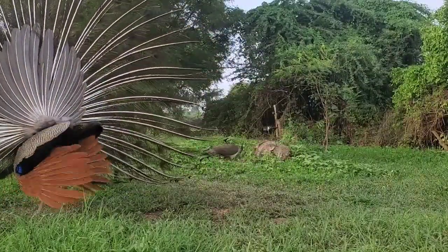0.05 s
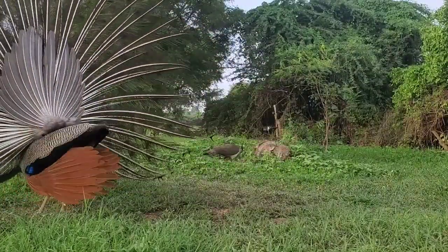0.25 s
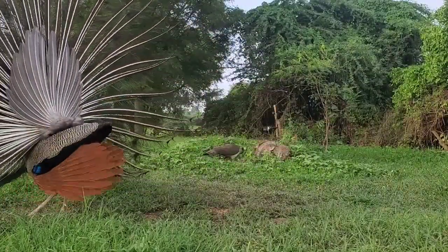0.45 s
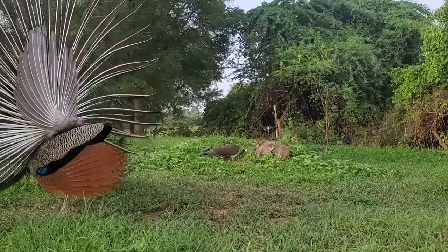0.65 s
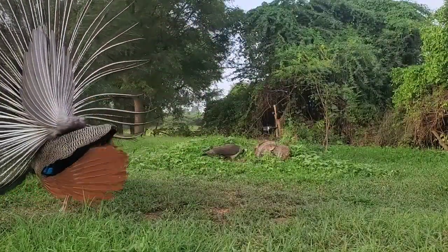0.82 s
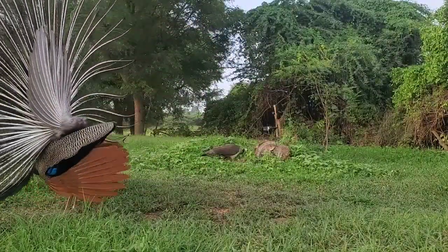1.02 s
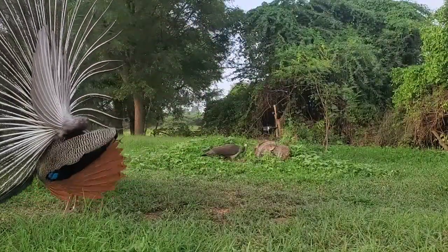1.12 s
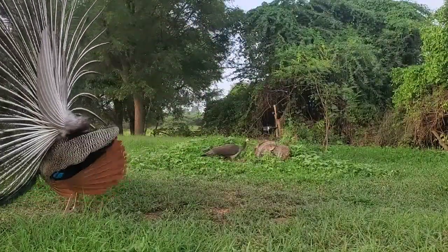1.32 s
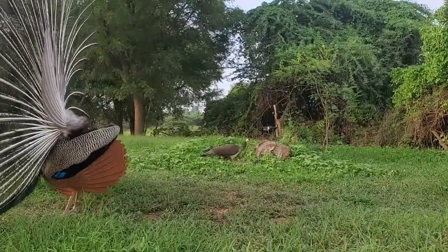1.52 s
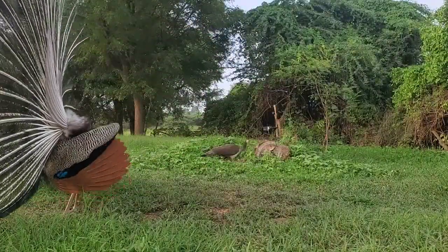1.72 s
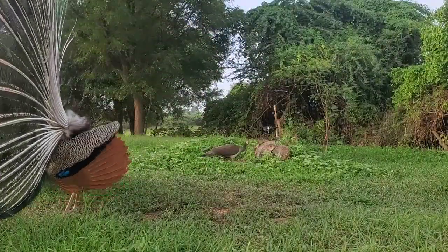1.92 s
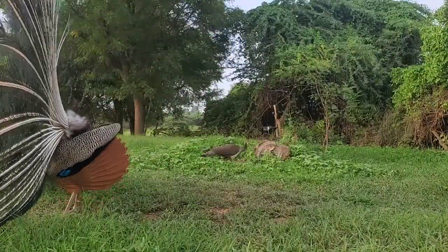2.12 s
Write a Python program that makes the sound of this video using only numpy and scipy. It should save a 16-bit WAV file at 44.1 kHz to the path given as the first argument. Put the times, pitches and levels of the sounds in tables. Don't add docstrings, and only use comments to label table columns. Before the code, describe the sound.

A bird's quick drooping whistle repeats over faint wing flutter, feather rustle and bursts of wind rumble

```python
import sys
import numpy as np
from scipy import signal
from scipy.fft import rfft, irfft, next_fast_len
from scipy.io import wavfile
from scipy.ndimage import uniform_filter1d, map_coordinates

SR = 44100
rng = np.random.default_rng(int(sys.argv[2]) if len(sys.argv) > 2 else 0)


def field_ratio(decibels):
    return 10 ** (np.asarray(decibels, dtype=float) / 20)


def wrap_up_sound(samples):
    columns = np.atleast_2d(samples).T
    tamed = np.clip(columns, -1, 1)
    steps = np.round(tamed * 32767).astype(np.int16)
    wavfile.write(sys.argv[1], SR, steps)


N = 94815
T = np.arange(N) / SR

# centre_s, peak_db
WING_BEATS = [(0.013, -50.5), (0.107, -47.5), (0.194, -50), (0.286, -55.5), (0.315, -47), (0.395, -54),
              (0.486, -59), (0.581, -58.5), (0.689, -55.5), (0.766, -52), (0.854, -50.5), (0.955, -58),
              (1.054, -51), (1.167, -59.5)]
# frequency_hz, density_db
WING_SPECTRUM = [(100, -6), (220, 6), (400, 3), (650, -5.5), (900, -38.5), (2000, -7.5)]
# centre_s, rms_db, length_s
RUSTLES = [(0.023, -57, 0.022), (0.14, -67, 0.15), (0.28, -70, 0.019), (.312, -57, 0.027),
           (0.388, -62.5, 0.016), (0.498, -66, 0.049), (0.57, -68.5, 0.027), (0.601, -68.5, 0.036),
           (0.69, -71, 0.055), (0.773, -60, 0.015), (0.799, -65, 0.032), (1.053, -74.5, 0.35),
           (1.384, -70.5, 0.08), (1.81, -71.5, 0.062)]
# frequency_hz, density_db
QUILL_SPECTRUM = [(500, -32), (750, -11.5), (1500, -7.5), (3000, -7), (6500, -9), (7600, -19), (11000, -10),
                  (15700, -6.5)]
# time_s, level_db
SHIVER_LEVEL = [
    (0.0, -67),
    (0.2, -73),
    (.4, -72.5),
    (.445, -81.5),
    (.49, -76),
    (1.1, -75),
    (2.15, -82.5),
]
# frequency_hz, density_db
MURMUR_SPECTRUM = [(120, -14), (250, 3.5), (500, 5), (800, -7), (1500, -68)]
# centre_s, peak_db
SNAPS = [
    (0.019, -55.5),
    (0.0574, -48),
    (0.126, -55),
    (0.3057, -63),
    (0.3815, -66),
    (0.468, -62),
    (0.596, -58),
    (0.6393, -61),
    (0.9633, -58),
]
# frequency_hz, density_db
SNAP_SPECTRUM = [(4000, -24), (9000, -7), (12000, -9), (15700, -13)]
# start_s, level_db, first_over_second_db
NEAR_CALLS = [
    (0.246, -56, -0.5),
    (0.818, -59, -1.5),
    (1.427, -56.5, -3.5),
    (2.012, -59, -4.5),
]
# start_s, length_s, level_db
LEVEL_NOTES = [
    (0.058, .085, -66),
    (0.638, .095, -66),
    (1.24, 0.085, -71),
    (1.848, 0.065, -71),
    (1.915, .05, -75),
]
# start_s, length_s, start_hz, end_hz, level_db
FAR_NOTES = [(0.03, 0.06, 2450, 2324, -75), (0.502, 0.04, 2370, 2600, -72), (.502, 0.026, 4850, 5100, -71),
             (.653, 0.02, 2520, 2724, -68), (0.684, 0.022, 2560, 2500, -67), (0.955, 0.04, 1500, 1520, -78),
             (0.997, 0.06, 1540, 1560, -73), (1.058, 0.014, 2550, 2750, -70), (1.07, .025, 2400, 1850, -72),
             (1.135, 0.05, 4620, 4350, -75), (1.53, 0.034, 4240, 4150, -75), (.608, .014, 2350, 2550, -73),
             (.22, .055, 3900, 3950, -75), (1.972, .025, 2950, 2700, -75), (2.03, .028, 3150, 3050, -76),
             (1.685, .02, 2200, 1900, -74), (.835, .045, 1080, 1100, -77), (1.625, .035, 4300, 4550, -77),
             (1.172, .022, 3350, 2500, -75)]
# start_s, length_s, start_hz, end_hz, level_db
LOW_NOTES = [
    (.503, 0.047, 1212, 1287, -66),
    (.728, 0.031, 1280, 1280, -70),
]
# start_s, length_s, start_hz, end_hz, level_db
CHIRPS = [(.958, .022, 4200, 4050, -77), (1.195, .02, 4550, 4400, -77), (1.222, .024, 4230, 4150, -74),
          (1.255, .028, 4200, 4000, -74), (1.372, .016, 2620, 2450, -74), (1.54, .022, 4150, 4100, -74),
          (1.572, .026, 4600, 3950, -74), (1.694, .016, 4250, 3800, -74), (1.708, .014, 3800, 4900, -75),
          (1.705, .022, 4850, 4900, -77), (1.72, .03, 3100, 3150, -75), (1.735, .014, 3600, 3900, -75),
          (1.743, .014, 4300, 5550, -74), (1.75, .025, 4300, 3900, -76), (1.847, .028, 3980, 4150, -75),
          (1.878, .018, 4050, 4100, -76), (1.9, .035, 4100, 4050, -76), (2.034, .016, 4350, 4050, -75),
          (2.05, .016, 3850, 3600, -75)]
# start_s, length_s, level_db
SWEEPS = [
    (.232, .028, -77),
    (1.57, .082, -75),
    (2.015, .08, -75),
]
# centre_s, level_db, length_s, pitch_hz
FLOCKS = [
    (0.951, -78.5, 0.13, 4500),
    (1.08, -76, 0.06, 1900),
    (1.4, -77.5, 0.19, 5500),
    (1.46, -83, 0.12, 5000),
    (1.745, -75.5, 0.028, 3750),
    (2.003, -79.5, 0.21, 5100),
    (1.6, -76, .07, 4100),
    (1.68, -82, 0.043, 2700),
]
# centre_s, peak_db, width_s
LEFT_EDDIES = [(0.247, -31.5, 0.066), (.54, -37, 0.1), (0.602, -35, 0.023), (0.675, -28, 0.027),
               (0.83, -37.5, 0.051), (1.002, -27.5, 0.017), (1.038, -29, 0.026), (1.0999, -21.5, 0.017),
               (1.202, -28, 0.017), (1.244, -20, 0.0099), (1.3, -17, 0.011), (1.268, -26.5, 0.016),
               (1.334, -22.5, 0.012), (1.36, -26, 0.014), (1.386, -23, .012), (1.413, -20, 0.022),
               (1.459, -26.5, 0.043), (1.513, -28, 0.041), (1.552, -31, 0.012), (1.581, -40, 0.033),
               (1.668, -33.5, 0.03), (1.717, -32.5, 0.038), (1.801, -29, 0.066), (1.859, -37, 0.053),
               (1.909, -32, 0.012)]
# centre_s, peak_db, width_s
RIGHT_EDDIES = [(0.085, -53, 0.012), (0.143, -38, 0.034), (0.251, -39.5, 0.046), (0.327, -45.5, 0.018),
                (0.655, -50, 0.025), (0.73, -35, 0.02), (0.789, -52.5, 0.015), (1.111, -41.5, 0.035),
                (1.144, -41, 0.015), (1.307, -29, 0.0087), (1.368, -26.5, 0.014), (1.434, -38.5, 0.027),
                (1.532, -30, 0.0091), (1.639, -49, 0.028), (1.768, -40, 0.031), (1.802, -27, 0.013),
                (1.919, -40, 0.055), (2.035, -51, 0.01)]
# centre_s, peak_db, pitch_hz, width_s
FLICKS = [
    (1.1001, -26.5, 150, 0.0062),
    (1.219, -31, 217, 0.013),
    (1.236, -16.5, 205.5, 0.0053),
    (1.264, -33.5, 218, 0.015),
    (1.297, -21, 228, 0.0076),
    (1.398, -36, 237, 0.011),
    (1.525, -38, 167, 0.0072),
    (1.796, -44, 180, 0.0071),
]
# frequency_hz, density_db
RUMBLE_SPECTRUM = [(18, -26), (40, -0.5), (60, -0.5), (110, -7.5), (170, -20.5), (300, -29.5), (550, -41.5),
                   (800, -58.5)]
# frequency_hz, density_db
LEAF_SPECTRUM = [(600, -36), (1100, -17), (2600, -0.5), (3500, -14), (4400, -1.5), (6800, -21), (7500, -21),
                 (15700, -28)]

LEAD_S = 0.00014
ECHO_DB, FAR_ECHO_DB, ECHO_T60_S, TREES_S = -14, -5, 0.25, 0.045
FLUTTER_DB, FAR_FLUTTER_DB, WAVER_HZ = 1.5, 3.5, 45
EDGE_S = 0.005


def unit(x):
    return x / np.sqrt(np.mean(x ** 2) + 1e-20)


def noise():
    return rng.standard_normal((2, N))


def wobble(rate):
    return map_coordinates(rng.standard_normal(200), [T * rate])


def filtered(x, response):
    m = next_fast_len(N + 8192)
    return irfft(rfft(x, m) * response(np.fft.rfftfreq(m, 1 / SR)), m)[..., :N]


def coloured(x, spectrum):
    f, db = np.transpose(spectrum)
    return unit(filtered(x, lambda hz: field_ratio(np.interp(np.log(hz + 1), np.log(f), db, -120, -120))))


def placed(a, b, alike, lead_s):
    u = np.arccos(alike) / 2
    shared, differing = np.cos(u) * a, np.sin(u) * b
    pair = np.array([shared + differing, shared - differing])
    side = np.array([[1], [-1]])
    return filtered(pair, lambda hz: np.exp(1j * np.pi * hz * lead_s * side))


def bumps(s, db, width):
    return field_ratio(db)[:, None] * np.exp(-0.5 * (2.426 * (T - s[:, None]) / width[:, None]) ** 2)


def wings():
    s, db = np.transpose(WING_BEATS)
    push = bumps(s, db - 6, np.full(len(s), 0.0046)).sum(0)
    puff = bumps(s, db - 11, np.full(len(s), 0.034)).sum(0)
    return placed(*((push + puff) * coloured(noise(), WING_SPECTRUM)), alike=1.0, lead_s=LEAD_S)


def quills():
    grains_per_s, grain_db = 660, -1
    hits = rng.random(N) < grains_per_s / SR
    ticks = hits * field_ratio(grain_db * rng.exponential(size=N)) * rng.standard_normal(N)
    raw = np.sqrt(0.5) * (noise() + unit(ticks) * [[1], [0]])
    swishes = bumps(*np.transpose(RUSTLES)).sum(0) * coloured(raw, QUILL_SPECTRUM)
    shiver = field_ratio(4.5 + 1.27 * wobble(12.65)) * coloured(noise(), QUILL_SPECTRUM)
    murmur = field_ratio(4 + 2.24 * wobble(10.2)) * coloured(noise(), MURMUR_SPECTRUM)
    bed = (shiver + murmur) * field_ratio(np.interp(T, *np.transpose(SHIVER_LEVEL)))
    return placed(*swishes, alike=0.57, lead_s=LEAD_S) + placed(*bed, alike=0.39, lead_s=0.000176)


def snaps():
    s, db = np.transpose(SNAPS)
    size = bumps(s, db - 3.5, np.full(len(s), 0.0015)).sum(0)
    return placed(*(size * coloured(noise(), SNAP_SPECTRUM)), alike=0.23, lead_s=LEAD_S)


def whistle(hz, gain, flutter_db):
    phase = 2 * np.pi * np.cumsum(hz) / SR
    return np.sqrt(2) * gain * field_ratio(flutter_db * wobble(70)) * np.sin(phase)


def gate(u, length):
    return np.clip(np.minimum(u, length - u) / EDGE_S, 0, 1) ** 2


def echoed(x, wet_db, lead_s):
    t = T[:SR // 3]
    tail = noise()[:, :len(t)] * field_ratio(-60 * t / ECHO_T60_S) * (1 - np.exp(-(t / TREES_S) ** 2))
    wet = signal.fftconvolve(x[None], tail / np.linalg.norm(tail[0]), axes=1)[:, :N]
    return placed(x, 0 * x, 0.71, lead_s) + field_ratio(wet_db) * wet


def near_bird():
    first_s, second_at_s, second_s = 0.029, 0.038, 0.074
    call_hz, droop_hz, fall_hz_per_s = 2532, 106, 12500
    hold_s, bend_s, swell_s = 0.01064, 0.018, 0.009
    out = 0
    for s, db, first_db in NEAR_CALLS:
        u, v = T - s, T - s - second_at_s
        swell = np.clip(v / swell_s, 0, 1)
        fade = field_ratio(3 - 10 * np.clip(v / second_s, 0, 1))
        release = np.sqrt(np.clip((second_s - v) / (3 * EDGE_S), 0, 1))
        second = gate(v, second_s) * swell * fade * release
        bridge = field_ratio(-15) * gate(u, second_at_s + EDGE_S)
        size = np.maximum(field_ratio(first_db) * gate(u, first_s) + second, bridge)
        slide = bend_s * np.logaddexp(0, np.clip(v - hold_s, -1, second_s) / bend_s * 2) / 2
        droop = droop_hz * np.clip(u / first_s, 0, 1) ** 2 * (u < first_s)
        out = out + whistle(call_hz - droop - fall_hz_per_s * slide, field_ratio(db) * size, FLUTTER_DB)
    out = filtered(out, lambda hz: 1 + field_ratio(-11) * np.exp(-2j * np.pi * hz * 0.0048))
    return echoed(out, ECHO_DB, lead_s=0.00008)


def level_notes():
    out = 0
    for s, d, db in LEVEL_NOTES:
        u = T - s
        hz = 2850 + WAVER_HZ * wobble(60) + 130 * np.exp(-np.abs(u) / 0.025)
        arch = np.sin(np.pi * np.clip(u / d, 0, 1)) ** 0.32
        out = out + whistle(hz, field_ratio(db) * arch * gate(u, d), FAR_FLUTTER_DB)
    return out


def glides(rows):
    out = 0
    for s, d, start_hz, end_hz, db in rows:
        hz = start_hz + WAVER_HZ * wobble(60) + (end_hz - start_hz) * np.clip((T - s) / d, 0, 1)
        out = out + whistle(hz, field_ratio(db) * gate(T - s, d), FAR_FLUTTER_DB)
    return out


def far_birds():
    second = echoed(level_notes(), ECHO_DB, lead_s=0.00012)
    left = echoed(glides(FAR_NOTES), FAR_ECHO_DB, lead_s=0.00007)
    right = echoed(glides([*LOW_NOTES, *CHIRPS]), ECHO_DB, lead_s=-0.00026) * field_ratio([[-1.5], [1.5]])
    return second + left + right


def sweeps():
    rows = [(s, d, 3980, 2780, db) for s, d, db in SWEEPS]
    return echoed(glides(rows), FAR_ECHO_DB, lead_s=0.00014)


def flocks():
    chirp_s = 0.01
    out = np.zeros(N)
    for s, db, length, hz in FLOCKS:
        when, pitch, bend, size = rng.standard_normal((4, 16, 1))
        start, stop = round((s - 0.2) * SR), round((s + 0.12) * SR)
        u = T[start:stop] - s - 0.52 * length * when
        turn = 2 * np.pi * hz * u * (1 + 0.05 * pitch + 0.025 * bend * u / chirp_s)
        chirps = field_ratio(db + 4.4 * size) * np.exp(-(2 * u / chirp_s) ** 2) * np.sin(turn)
        out[start:stop] += chirps.sum(0)
    return echoed(out, FAR_ECHO_DB, lead_s=0.00002)


def eddies(s, db, hz, width):
    swing = np.sin(2 * np.pi * hz[:, None] * (T - s[:, None]))
    return -np.sum(bumps(s, db, 0.86 * width) * swing, 0)


def wind():
    wake_db, wake_lag_s, wake_s, calm_db = -16, 0.02, 0.031, -50.5
    ports = []
    for rows in (LEFT_EDDIES, RIGHT_EDDIES):
        s, db, width = np.transpose(rows)
        hz = 50.9 + 0.23 / width + 7.8 * rng.standard_normal(len(s))
        wakes = bumps(s + wake_lag_s, db + wake_db, width + wake_s)
        level = np.sqrt(np.sum(wakes ** 2, 0) + field_ratio(calm_db) ** 2)
        rumble = level * field_ratio(2.5 * wobble(14.42)) * coloured(noise()[0], RUMBLE_SPECTRUM)
        ports.append(eddies(s, db, hz, width) + rumble)
    return np.array(ports) + eddies(*np.transpose(FLICKS)) * [[1], [0]]


def trees():
    z = signal.stft(noise(), nperseg=512)[2]
    field = uniform_filter1d(rng.standard_normal(z.shape[1:]), 5, 0)
    patches = field_ratio(5.6 * unit(uniform_filter1d(field, 14, 1)))
    hiss = coloured(signal.istft(z * patches, nperseg=512)[1][:, :N], LEAF_SPECTRUM)
    return field_ratio(-71.5) * placed(*hiss, alike=0.11, lead_s=LEAD_S)


def scene():
    fowl = wings() + quills() + snaps()
    birds = near_bird() + far_birds() + sweeps() + flocks()
    return fowl + birds + wind() + trees()


def roll_off(x):
    return signal.sosfilt(signal.butter(12, 16300, fs=SR, output="sos"), x)


def record(dry):
    low_cut_hz, clip_top, top_hz = 22, 0.31, 15780
    x = filtered(dry, lambda hz: hz ** 4 / (hz ** 4 + low_cut_hz ** 4))
    x = x / np.sqrt(1 + (x / clip_top) ** 2)
    return roll_off(filtered(x, lambda hz: hz < top_hz))


dry = scene()
out = record(dry)
wrap_up_sound(out)
```